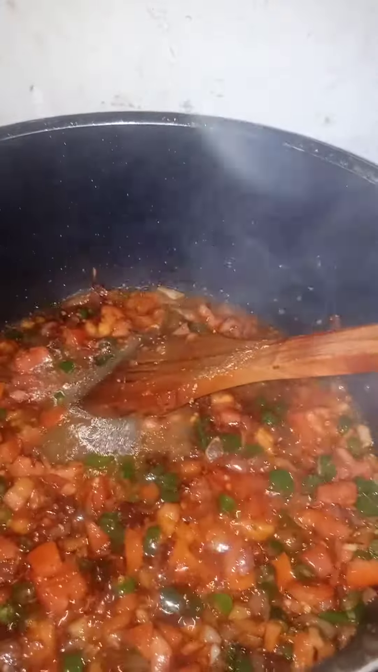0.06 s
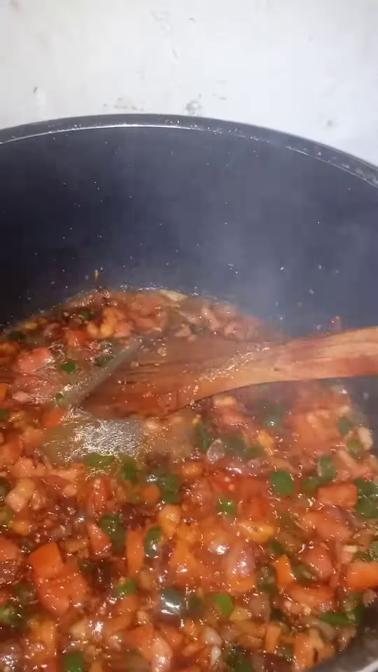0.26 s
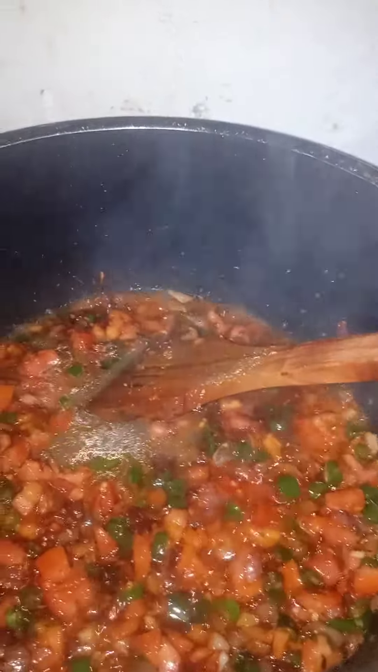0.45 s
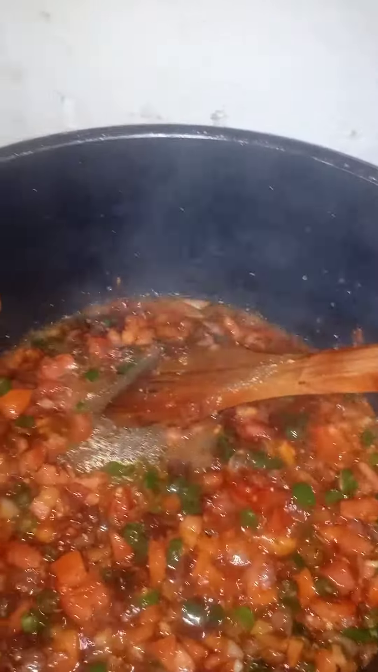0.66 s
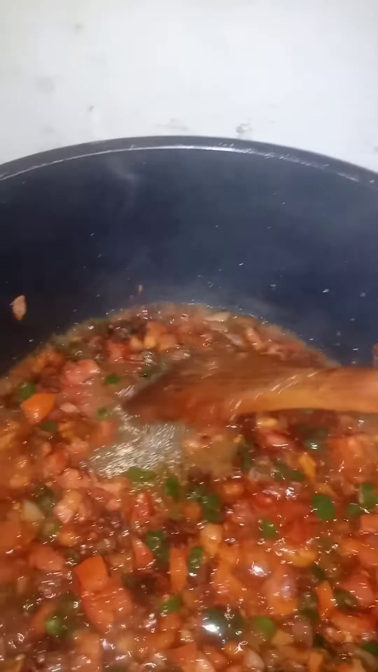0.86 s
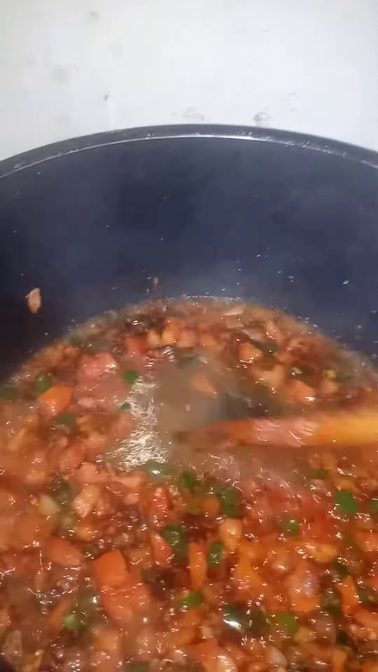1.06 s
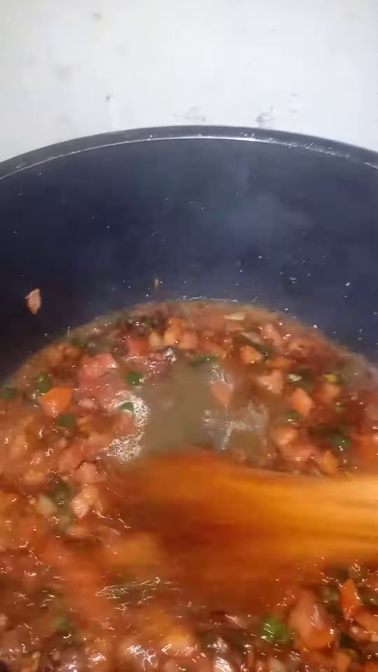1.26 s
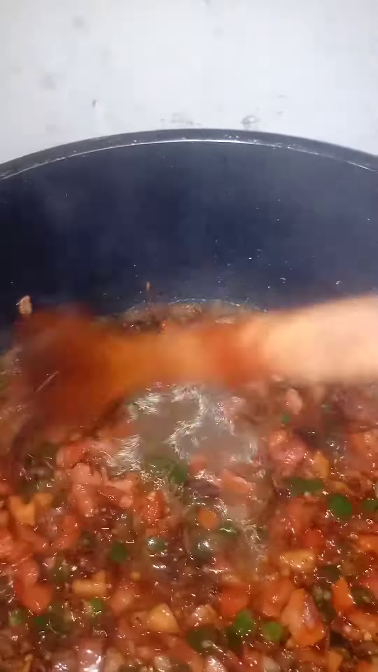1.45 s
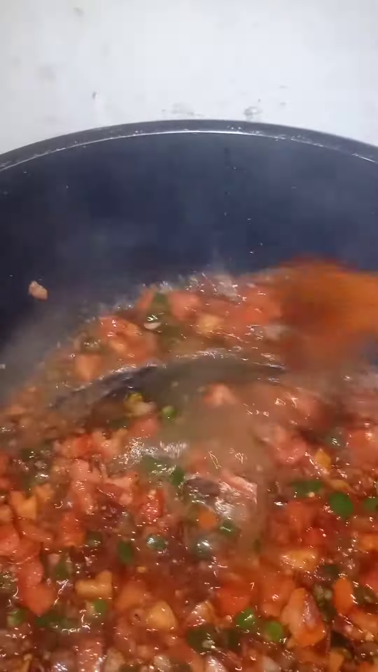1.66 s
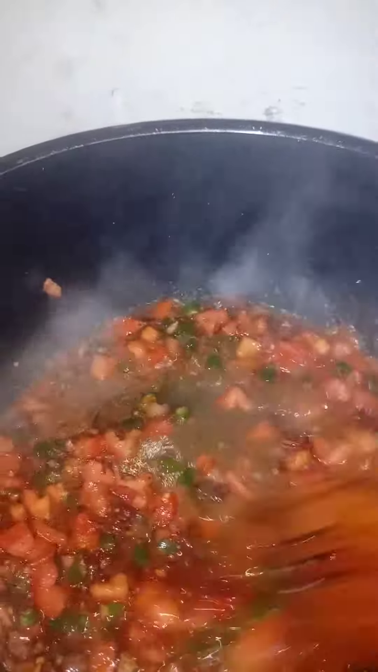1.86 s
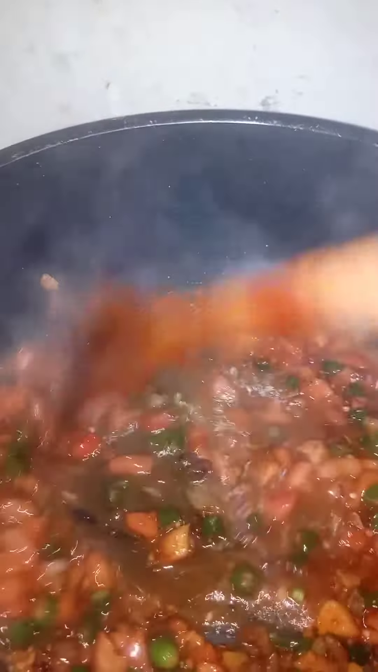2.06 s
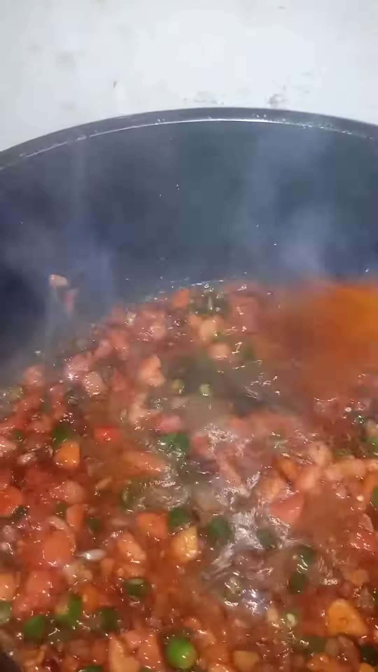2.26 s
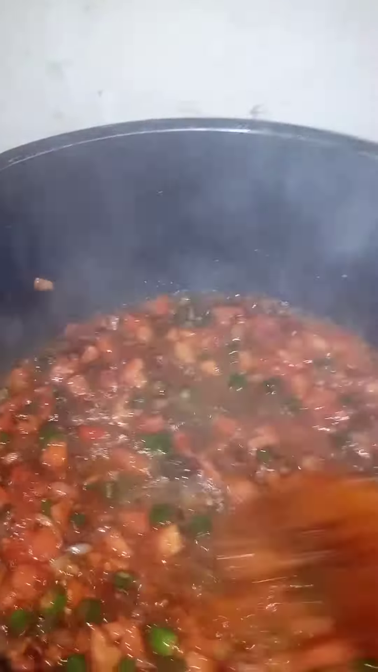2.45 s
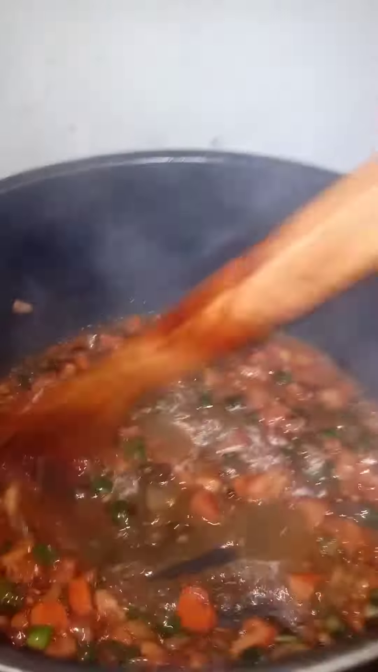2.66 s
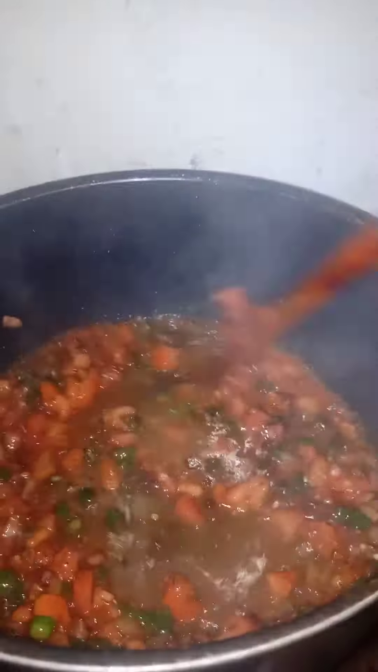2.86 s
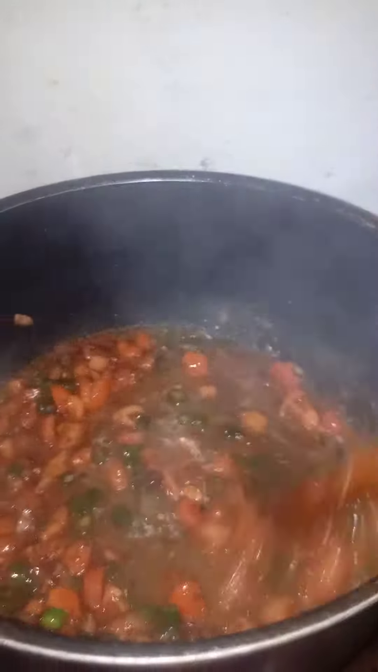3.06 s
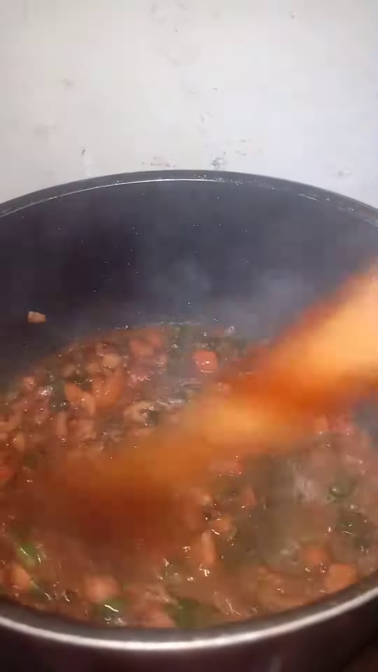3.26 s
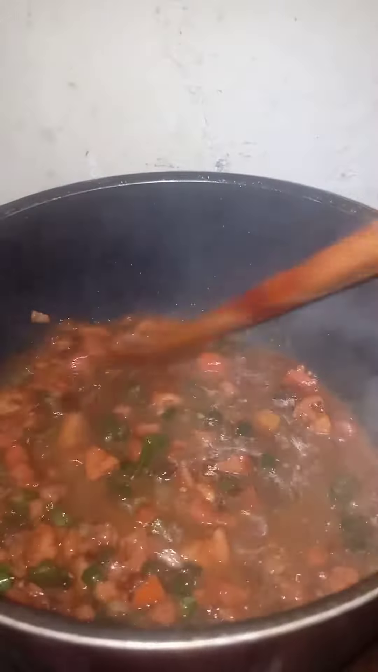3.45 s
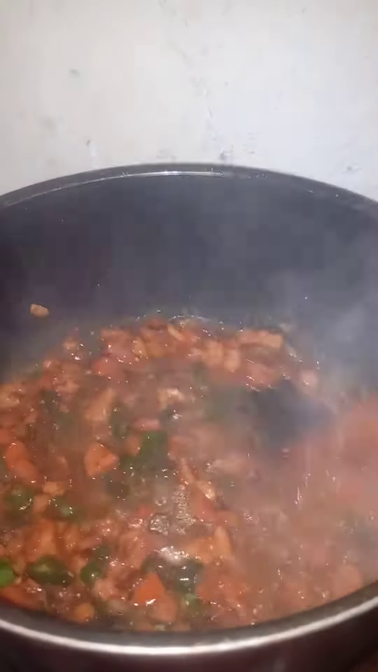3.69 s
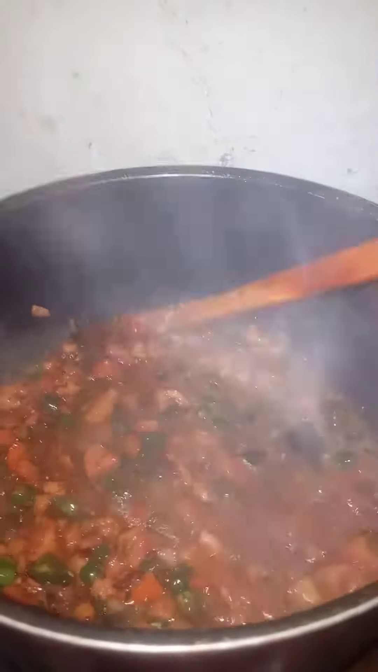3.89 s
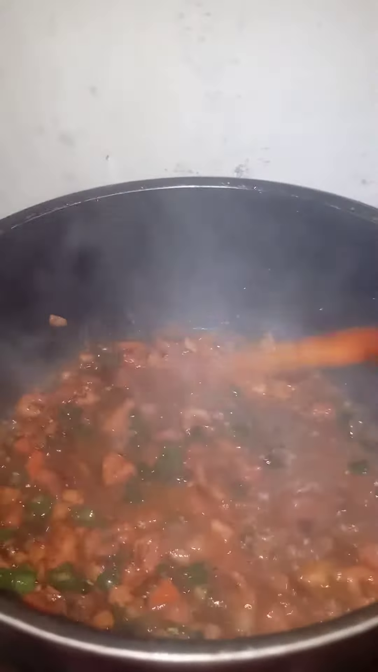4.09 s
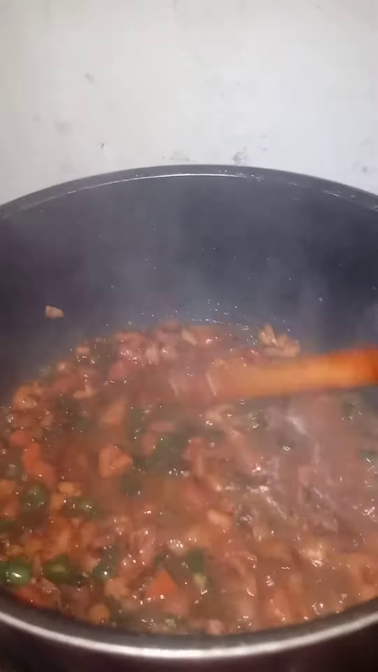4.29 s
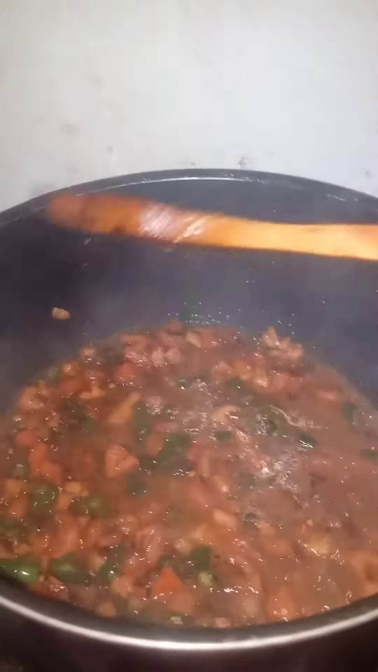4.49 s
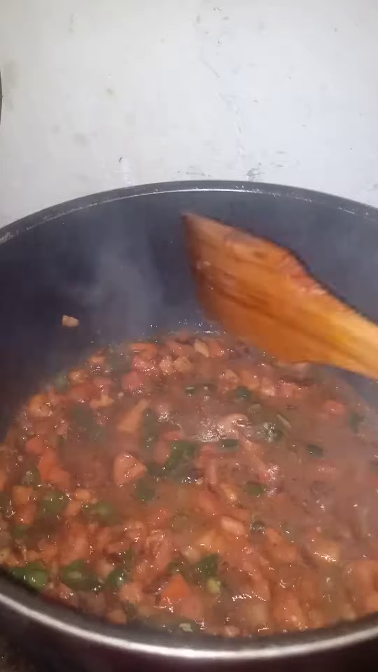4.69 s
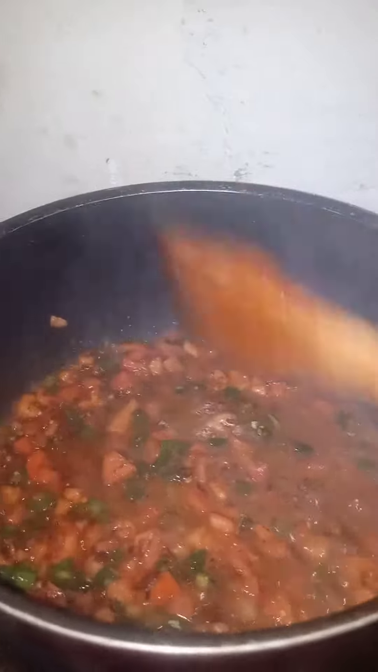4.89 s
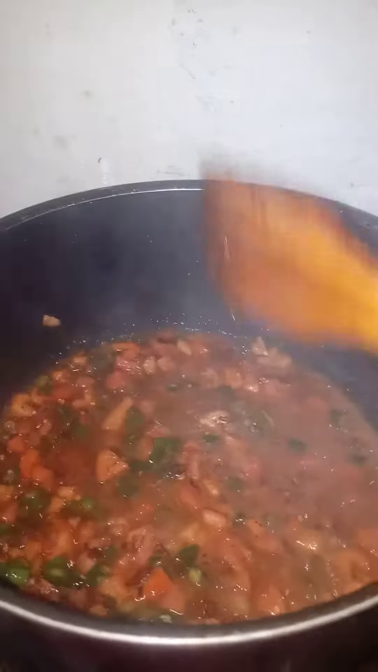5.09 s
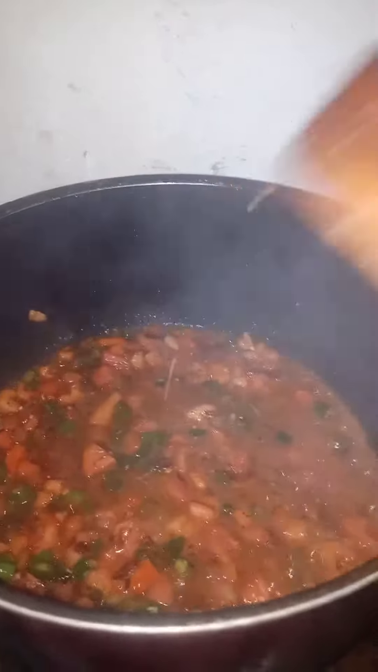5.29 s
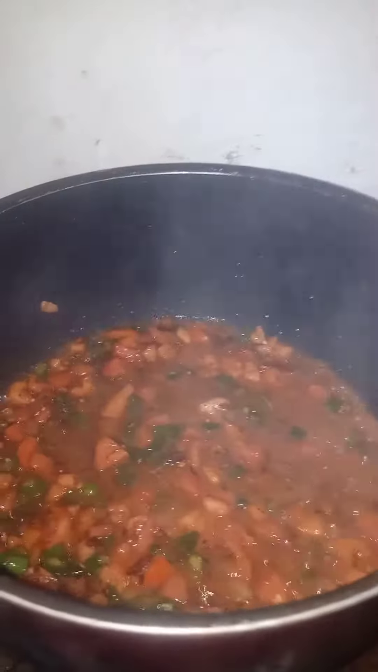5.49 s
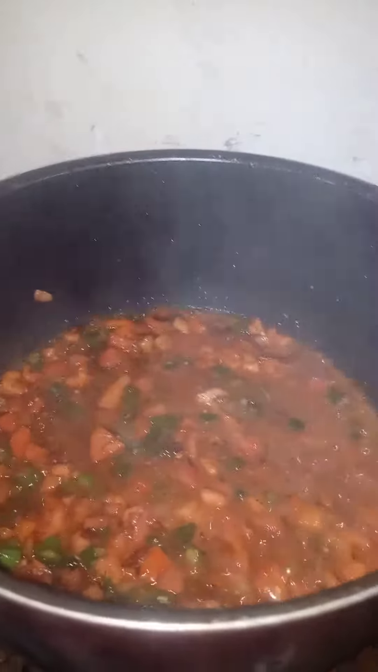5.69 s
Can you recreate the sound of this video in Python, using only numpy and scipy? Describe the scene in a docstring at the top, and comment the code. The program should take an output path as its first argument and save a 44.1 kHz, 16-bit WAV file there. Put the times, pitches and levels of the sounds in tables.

```python
"""Small kitchen: curry simmers and sizzles in a deep metal pot, heard close up.
Steam bursts and bubbles are random impulses and noise, shaped by filters and by the air in the pot.
A wooden spoon stirs, bumps the bottom, pats the thick sauce and raps the rim three times.
Each hit sums damped modes and filtered contact noise; room and pot answer with slow low resonances.
The hiss swells whenever wet sauce is pushed over hot metal."""
import sys
import numpy as np
from scipy import signal
from scipy.fft import rfft, irfft, next_fast_len
from scipy.io import wavfile
from scipy.ndimage import map_coordinates

SR = 44100
rng = np.random.default_rng(int(sys.argv[2]) if len(sys.argv) > 2 else 0)


def inscribe(sig):
    """Save sig as 16-bit PCM at rate SR to the path in sys.argv[1].

    A 1-D sig is mono; a 2-D sig holds one channel per row.
    Samples are clipped to [-1, 1] before scaling.
    """
    pcm = np.round(np.clip(np.atleast_2d(sig).T, -1, 1) * 32767)
    wavfile.write(sys.argv[1], SR, pcm.astype(np.int16))


N = 252944

# Strokes pushing wet sauce over hot metal: start_s, push_s, added_sizzle_limit_db
STROKES = [(0.0, 0.28, -52), (0.625, 0.037, -60), (1.534, 0.39, -42.5), (2.07, 0.1, -47.5),
           (2.38, 0.17, -53), (2.965, 0.43, -48), (3.556, 0.19, -46.5)]
# Filter curves of sizzle, seething simmer and fine spray: freq_hz, gain_db
SIZZLE_CURVE = [(600, -54), (1200, -11.5), (1650, -6.5), (2400, -3), (3300, -2.5), (4400, 1.5),
                (4900, -2.5), (5700, -19.5), (6500, -21.5), (7300, -31), (8200, -46.5), (16000, -77.5)]
SIMMER_CURVE = [(40, -37.5), (90, -14.5), (150, -27), (220, -13.5), (330, -14.5), (1000, -6), (1400, -9),
                (2500, -24.5), (6000, -76)]
SPRAY_CURVE = [(5000, -31), (8000, -18.5), (11000, -9), (13800, -7), (14900, -1), (15800, -4.5)]
# Air resonances in the pot, low and high: freq_hz, width_hz, gain_db
AIR_LOW = [(326.6, 19.6, -1), (524, 153, -9.5), (642, 19, 2), (870, 124, -6), (1041, 98, -2)]
AIR_HIGH = [(2017, 40, 1.3), (2437, 146, 1.6), (2980, 87, 3.1), (3560, 65, 2.2), (3996, 193, 1.2),
            (4500, 96, 0.4)]

# Spoon on the pot through sauce: start_s, level_db (before trim), then relative body_db, thump_db,
# clack_db, spoon_db, and drag_t60_s, floor_pitch_hz, floor_db
BUMPS = [(0.169, -35, -2, -10.5, -0.5, -8, 0.03, 283, 3), (0.222, -45, 1, -11, -17, -17, 0.016, 271, -3),
         (0.364, -31, -0.5, -16.5, -19, -3.5, 0.029, 336, 3.5),
         (0.378, -32, -14, -35, -18, -10, 0.017, 228, 2), (0.403, -36, -12, -25, -22, -12, 0.022, 262, 6),
         (1.428, -42, -1, -11, -18, 0, 0.03, 141, -4.5),
         (2.146, -36.5, -4.5, -12.5, -11, -5.5, 0.06, 227, 0),
         (2.419, -37, -14, -17, -21, 2.5, 0.03, 330, 0.5),
         (2.436, -40.5, 1.5, -10, -22, -1, 0.023, 140, -2.5),
         (2.924, -41, -20, -13, -27, -14, 0.02, 294, -2.5)]
# Flat of the spoon on sauce: start_s, level_db, reflection_pitch_hz, contact_cutoff_hz,
# then relative slap_db, reflection_db, room_return_db
PATS = [(2.312, -41.5, 396, 420, -18, -9.5, -10), (2.846, -40, 410, 1400, -8.5, -5, -9),
        (4.016, -30.5, 363, 1500, -7.5, -4, -8), (4.273, -34, 353, 602, -11, -2.5, -8.5)]
# Spoon dragged along the bottom: start_s, length_s, level_db
SLIDES = [(2.46, 0.24, -59), (3.13, 0.16, -56.5)]
# Spoon on the rim: start_s, level_db (before trim), relative thump_db, rim_db, crack_db,
# tip_pitch_hz, tip_db, favoured_mode_hz, favoured_mode_db, room_body_db
RAPS = [(4.719, -19, -7.5, -12.5, -14.5, 955, -3, 598, -14.5, -2.5),
        (4.969, -24, -7.5, -6.5, -11, 963, -4, 572.4, -7, -18),
        (5.187, -22, -9, -8, -7.5, 1056, -6, 363.5, -5.5, -12)]

# Slow shared low resonances of room and pot, upper and lowest: freq_hz, level_db, t60_s
BODY_MODES = [(210.4, 0.5, 0.33), (232.4, -18, 0.71), (265.7, -3.5, 0.54), (319.8, 5, 0.28),
              (353.4, -0.5, 0.41), (488, -10, 0.26), (565, -3.5, 0.38), (603, -2.5, 0.34), (654, -6, 0.42),
              (745, -8.5, 0.22), (906, -16.5, 0.38), (954, -6.5, 0.38), (1306, -12.5, 0.18),
              (1370, -16.5, 0.22)]
THUMP_MODES = [(75, -7.5, 1), (95.6, 0, 0.56), (137.3, -3.5, 0.34)]
# Modes of rim, spoon handle, room's ringing return after a pat, wet blade: freq_hz, level_db, t60_s
RIM_MODES = [(2070, -6, 0.09), (2300, -7, 0.13), (3030, -12, 0.12), (3330, -0.5, 0.097), (3560, -1, 0.15),
             (3704, -5, 0.17), (3800, -6, 0.06), (4770, -11, 0.06)]
HANDLE_MODES = [(322.8, -2.5, 0.21), (628, -13, 0.066)]
RETURN_MODES = [(364, 5, 0.35), (403, -12, 0.43), (468, -8.5, 0.29), (524, -4, 0.21), (562, -11.5, 0.2),
                (650, -11.5, 0.18)]
BLADE_MODES = [(342, -1, 0.082), (483, 1.5, 0.08), (646, -2.5, 0.19), (810, -10.5, 0.09)]
# Modes of pot floor, hollow early reflection of a slap, spoon tip: pitch_multiple, level_db, t60_s
FLOOR_MODES = [(1, 1, 0.11), (1.63, -13.5, 0.11), (2.15, -20, 0.2)]
REFLECTION_MODES = [(0.55, -26, 0.16), (1, 7, 0.043), (1.75, -12.5, 0.045)]
TIP_MODES = [(0.84, -10.5, 0.04), (1, 3, 0.036), (1.24, -12, 0.05)]

# Filter curves of cushioned knock, wood clack, spoon edge on metal, sauce splash, drag rumble,
# wooden knock, hard crack on the rim, late room body: freq_hz, gain_db
THUD_CURVE = [(70, -25), (140, -24.5), (220, -1), (320, -3.5), (420, -1.5), (530, -10.5), (750, -10.5),
              (1100, -23.5), (1500, -21), (6000, -64)]
CLACK_CURVE = [(400, -31.5), (900, 7), (1850, 4.5), (2200, 1.5), (5000, -30.5), (8000, -69)]
KNOCK_CURVE = [(150, -36), (350, 8), (600, 5), (950, 1.5), (1300, -14), (2200, -17), (6000, -54)]
SAUCE_CURVE = [(60, -51), (100, -36.5), (150, -41), (200, -12.5), (250, -25.5), (320, 10.5), (390, 9),
               (480, -2.5), (650, -15.5), (900, -27), (1500, -31), (5000, -81)]
RUMBLE_CURVE = [(50, -14), (90, -4.5), (150, -4.5), (230, -4), (320, 1.5), (450, -4.5), (900, -30),
                (3000, -90)]
WOOD_CURVE = [(80, -23.5), (150, -12.5), (210, -3.5), (330, 2), (450, 0.5), (620, -4), (780, -2.5),
              (1000, -12), (1400, -8.5), (2200, -19), (4500, -27), (5800, -41), (7300, -54), (8500, -75)]
CRACK_CURVE = [(600, -47), (1200, -2), (1700, -5), (2400, -5), (3500, 5.5), (4600, 5.5), (5700, -10.5),
               (7200, -27.5), (8300, -49), (12000, -43), (16000, -68)]
ROOM_BODY_CURVE = [(120, -34.5), (220, -2), (380, 0.5), (600, -1.5), (780, 1), (900, -12), (1200, -19),
                   (2500, -54), (7000, -100)]
# Kitchen reverberation: freq_hz, t60_s
KITCHEN_DECAY = [(100, 1), (350, 0.52), (1000, 0.45), (4000, 0.059)]

# Boiling: levels with a bare patch on the bottom; time constants of flare-up and drying
SIZZLE_DB, SIMMER_DB, SPRAY_DB = -47, -53, -84.5
FLARE_TAU_S, DRY_TAU_S = 0.27, 0.25
# Sauce flows over the bare patch: onset, time constant, final sizzle change
COVER_START_S, COVER_TAU_S, COVERED_DB = 4.04, 0.92, -4.5
SPRAY_DB_PER_SIZZLE_DB, SIMMER_DB_PER_COVER_DB = 2.3, 0.61
# Tonal grain in the sizzle: median pitch, its log spread, cycles to fall to 1/e, gain
GRAIN_HZ, GRAIN_LOG_SPREAD, GRAIN_CYCLES, GRAIN_DB = 3500, 0.26, 10, -8

# Hits: rise times of the shared modes, favoured mode's decay, delays after contact
THUMP_RISE_S, BODY_RISE_S, FAVOURED_T60_S = 0.0078, 0.02, 0.19
SKID_S, REFLECTION_S, RETURN_S, ROOM_BODY_S = 0.005, 0.00693, 0.034, 0.018
RAP_SPOON_DB, RAP_BODY_DB, RAP_WOOD_DB = 1.5, -5.5, -8
RAP_BUZZ_DB, RAP_CLACK_DB = -1.5, -17
# Dull return of a rap from across the kitchen
FAR_WALL_S, FAR_WALL_DB, FAR_WALL_HZ = 0.046, -14.5, 583
# Microphone band limits
LOW_HZ, TOP_HZ = 59, 15800


def amp(db):
    """Decibels to gain."""
    return 10 ** (np.asarray(db) / 20)


def unit(x):
    """Scale to rms 1."""
    return x / np.sqrt(np.mean(x ** 2) + 1e-20)


def blow(x):
    """Scale a hit to rms 1 over its first 40 ms."""
    return x / np.sqrt(np.mean(x[:SR // 25] ** 2) + 1e-20)


def along(points, hz):
    """Interpolate (freq_hz, value) points on a log frequency axis."""
    f, v = np.transpose(points)
    return np.interp(np.log(hz + 1), np.log(f + 1), v)


def wobble(rate_hz):
    """Smooth random curve, rate_hz knots a second."""
    knots = rng.standard_normal(int(N * rate_hz / SR) + 4)
    return map_coordinates(knots, [np.arange(N) * rate_hz / SR])


def swell(start_s, length_s):
    """Half-sine rise and fall."""
    return np.sin(np.pi * np.clip((np.arange(N) / SR - start_s) / length_s, 0, 1))


def filtered(x, response):
    """Multiply the spectrum by a response of frequency."""
    m = next_fast_len(len(x) + SR // 2)
    return irfft(rfft(x, m) * response(np.fft.rfftfreq(m, 1 / SR)), m)[:len(x)]


def coloured(x, points):
    """Minimum-phase filter with the gain of (freq_hz, gain_db) points."""
    size = 8192
    cepstrum = irfft(np.log(amp(along(points, np.fft.rfftfreq(size, 1 / SR)))))
    # fold to the causal half
    cepstrum[1:size // 2] *= 2
    cepstrum[size // 2 + 1:] = 0
    impulse = irfft(np.exp(rfft(cepstrum)))
    return signal.fftconvolve(x, impulse)[:len(x)]


def resonant(x, peaks):
    """Parallel resonances of alternating sign, with steep skirts outside their range."""
    def response(f):
        total = 0
        for k, (hz, width_hz, db) in enumerate(peaks):
            band = 1j * f * width_hz
            total = total + (-1) ** k * amp(db) * band / (hz * hz - f * f + band)
        return total
    y = filtered(x, response)
    low_hz = min(p[0] for p in peaks) * 0.76
    high_hz = min(max(p[0] for p in peaks) * 1.088, SR / 3)
    return signal.sosfilt(signal.butter(8, [low_hz, high_hz], 'band', fs=SR, output='sos'), y)


def softened(x, hz):
    """Low-pass: a soft contact or dull wall passes little above hz."""
    return signal.sosfilt(signal.butter(2, min(hz, SR / 3), fs=SR, output='sos'), x)


def pops(rate_hz, spread_db):
    """Bursting bubbles: random impulses of uneven size, rate_hz a second on average."""
    hits = rng.random(N) < rate_hz / SR
    return unit(hits * rng.standard_normal(N) * amp(spread_db * rng.standard_normal(N)))


def tuned(modes, hz):
    """Set modes given as pitch multiples on a pitch."""
    return [(k * hz, db, t60_s) for k, db, t60_s in modes]


def ring(modes, rise_s=0.0011):
    """Damped modes that swell over rise_s, at new strengths for each blow."""
    t = np.arange(SR) / SR
    total = 0
    for k, (hz, db, t60_s) in enumerate(modes):
        decay = amp(db + rng.normal() - 60 * t / t60_s)
        total = total + decay * np.sin(2 * np.pi * hz * t) * (-1) ** k
    return blow((1 - np.exp(-(t / rise_s) ** 2)) * total)


def contact(t60_s, chatter_db):
    """One push plus decaying noise chatter."""
    chatter = rng.standard_normal(SR) * amp(-60 * np.arange(SR) / SR / t60_s)
    return signal.unit_impulse(SR) + amp(chatter_db) * chatter / np.linalg.norm(chatter)


def echoed(x, wet_db):
    """A short sound followed by the kitchen's answer, in which bass lasts longest."""
    hz, t, z = signal.stft(rng.standard_normal(SR), SR, nperseg=256)
    decay = amp(-60 * t / along(KITCHEN_DECAY, hz)[:, None])
    tail = signal.istft(z * decay, SR, nperseg=256)[1]
    tail[:round(.007 * SR)] = 0  # delay of the nearest wall
    return x + amp(wet_db) * signal.fftconvolve(x, tail / np.linalg.norm(tail))[:len(x)]


def add(track, start_s, sound):
    """Mix a sound in at start_s."""
    part = track[round(start_s * SR):][:len(sound)]
    part += sound[:len(part)]


def in_pot(x, t60_s, wet_db):
    """Reflections between the pot's walls comb a sound into many fixed narrow peaks."""
    return unit(signal.fftconvolve(x, contact(t60_s, wet_db))[:N])


def tonal_grains(rate_hz, spread_db):
    """Short decaying sines at random pitches that add a faint tonal grain to the sizzle."""
    pitch, size = rng.standard_normal((round(rate_hz * N / SR), 2)).T
    hz = np.minimum(GRAIN_HZ * np.exp(GRAIN_LOG_SPREAD * pitch), SR / 3)[:, None]
    cycles = hz * np.arange(400) / SR
    grains = np.sin(2 * np.pi * cycles) * np.exp(-cycles / GRAIN_CYCLES)
    grains *= amp(spread_db * size)[:, None]
    starts = rng.integers(0, N, len(grains))[:, None]
    places = starts + np.arange(grains.shape[1])
    return unit(np.bincount(places.ravel(), grains.ravel(), N)[:N])


def boiling():
    """Sizzle, simmer, spray dB: strokes flare and boil dry; all calm as sauce covers the bottom."""
    t = np.arange(N) / SR
    covered_db = COVERED_DB * (1 - np.exp(-np.maximum(t - COVER_START_S, 0) / COVER_TAU_S))
    power = amp(SIZZLE_DB + covered_db) ** 2
    for start_s, push_s, db in STROKES:
        wetted = 1 - np.exp(-np.clip(t - start_s, 0, push_s) / FLARE_TAU_S)
        drying = np.exp(-np.maximum(t - start_s - push_s, 0) / DRY_TAU_S)
        power = power + amp(db) ** 2 * wetted * drying
    sizzle_db = 10 * np.log10(power)
    simmer_db = SIMMER_DB + SIMMER_DB_PER_COVER_DB * covered_db
    spray_db = SPRAY_DB + SPRAY_DB_PER_SIZZLE_DB * (sizzle_db - SIZZLE_DB)
    return sizzle_db, simmer_db, spray_db


def cooking():
    """Tiny steam bursts hiss, larger bubbles simmer; both sound the air in the pot."""
    sizzle_db, simmer_db, spray_db = boiling()
    bursts = unit(pops(1500, spread_db=-1.5) + amp(4.5) * rng.standard_normal(N))
    hiss = in_pot(coloured(bursts, SIZZLE_CURVE), t60_s=.07, wet_db=-10)
    hollow = in_pot(resonant(pops(5000, spread_db=3), AIR_HIGH), t60_s=.1, wet_db=-7)
    spits = in_pot(coloured(pops(60, spread_db=2), SIZZLE_CURVE), t60_s=.04, wet_db=3)
    grain = unit(coloured(tonal_grains(450, spread_db=4.5), SIZZLE_CURVE))
    sizzle = amp(-3.0) * hiss + amp(-3.5) * hollow + amp(-14.5) * spits + amp(GRAIN_DB) * grain
    sizzle *= amp(sizzle_db + 0.5 * wobble(20))

    bubbles = unit(resonant(pops(1500, spread_db=0.5), AIR_LOW))
    seethe = unit(coloured(rng.standard_normal(N), SIMMER_CURVE))
    simmer = amp(simmer_db + 0.2 * wobble(3.5)) * (amp(-0.5) * bubbles + amp(-6.0) * seethe)

    droplets = pops(2700, spread_db=-12.0) + amp(10.5) * bursts
    spray = amp(spray_db + 1.2 * wobble(24)) * unit(coloured(droplets, SPRAY_CURVE))
    return sizzle + simmer + spray


def bumps():
    """Sauce cushions the spoon: dull knock, slow low resonances of room and pot, then a wood clack."""
    track = np.zeros(N)
    for start_s, db, body_db, thump_db, clack_db, spoon_db, drag_t60_s, floor_hz, floor_db in BUMPS:
        push = contact(drag_t60_s, chatter_db=-8)
        knock = blow(coloured(echoed(push, wet_db=-7.5), THUD_CURVE))
        floor = ring(tuned(FLOOR_MODES, floor_hz), rise_s=0.001)
        body = blow(softened(ring(BODY_MODES, BODY_RISE_S), 490))
        thump = ring(THUMP_MODES, THUMP_RISE_S)
        skid = contact(t60_s=0.11, chatter_db=30)
        clack = blow(coloured(echoed(skid, wet_db=-15), CLACK_CURVE))
        spoon = blow(coloured(contact(t60_s=0.1, chatter_db=8), KNOCK_CURVE))
        bump = knock / 2 + amp(floor_db) * floor + amp(body_db) * body
        bump += amp(thump_db) * thump + amp(spoon_db) * spoon
        add(track, start_s, amp(db - 11.0) * bump)
        add(track, start_s + SKID_S, amp(db + clack_db - 9.0) * clack)
    return track


def pats():
    """Blade slaps sauce; a hollow early reflection follows, then the room's ringing return."""
    track = np.zeros(N)
    for start_s, db, reflection_hz, contact_hz, slap_db, reflection_db, room_return_db in PATS:
        push = contact(t60_s=0.08, chatter_db=10)
        splash = blow(coloured(echoed(push, wet_db=-6), SAUCE_CURVE))
        blade = ring(BLADE_MODES, rise_s=0.0014)
        slap = blow(softened(blade + amp(-8) * splash, contact_hz))
        reflection = ring(tuned(REFLECTION_MODES, reflection_hz), rise_s=0.007)
        room_return = ring(RETURN_MODES, rise_s=0.003)
        add(track, start_s, amp(db + slap_db) * slap)
        add(track, start_s + REFLECTION_S, amp(db + reflection_db) * reflection)
        add(track, start_s + RETURN_S, amp(db + room_return_db) * room_return)
    return track


def slides():
    """The dragged spoon sets off a faint rumble of filtered impulses that swells and fades."""
    track = np.zeros(N)
    for start_s, length_s, db in SLIDES:
        rumble = unit(coloured(pops(290, spread_db=1.0), RUMBLE_CURVE))
        track += amp(db) * swell(start_s, length_s) * rumble
    return track


def raps():
    """Bare wood on the rim: spoon knock, buzzing metal, slow low resonances, then late room body."""
    track = np.zeros(N)
    for (start_s, db, thump_db, rim_db, crack_db,
         tip_hz, tip_db, favoured_hz, favoured_db, room_body_db) in RAPS:
        tip = echoed(ring(tuned(TIP_MODES, tip_hz), rise_s=0.00095), wet_db=-16)
        spoon = amp(RAP_SPOON_DB) * ring(HANDLE_MODES) + amp(tip_db) * tip
        favoured = ring([(favoured_hz, 0, FAVOURED_T60_S)], BODY_RISE_S)
        body = amp(RAP_BODY_DB) * ring(BODY_MODES, BODY_RISE_S) + amp(favoured_db) * favoured

        wood_push = contact(t60_s=0.041, chatter_db=-9.0)
        wood = blow(coloured(echoed(wood_push, wet_db=1), WOOD_CURVE))
        crack_push = contact(t60_s=0.082, chatter_db=23)
        crack = blow(coloured(echoed(crack_push, wet_db=1.5), CRACK_CURVE))
        buzz_push = contact(t60_s=.02, chatter_db=-9)
        buzz = blow(signal.fftconvolve(ring(RIM_MODES), buzz_push)[:SR])
        clack_push = contact(t60_s=0.073, chatter_db=16.5)
        clack = blow(coloured(echoed(clack_push, wet_db=-13.5), CLACK_CURVE))

        metal = amp(RAP_BUZZ_DB) * buzz + amp(RAP_CLACK_DB) * clack
        knock = spoon + body + amp(RAP_WOOD_DB) * wood
        thump = amp(thump_db - 2.5) * ring(THUMP_MODES, THUMP_RISE_S)
        rap = knock + thump + amp(rim_db) * metal + amp(crack_db) * crack
        rap *= amp(db - 14.5)

        # the kitchen's low-mid answer
        room_push = contact(t60_s=0.17, chatter_db=25)
        room_body = blow(coloured(echoed(room_push, wet_db=-12), ROOM_BODY_CURVE))
        add(track, start_s, rap)
        add(track, start_s + ROOM_BODY_S, amp(db + room_body_db - 17.5) * room_body)
        add(track, start_s + FAR_WALL_S, amp(FAR_WALL_DB) * softened(rap, FAR_WALL_HZ))
    return track


def scene():
    """Pot, spoon and the room's answers, heard from one point."""
    return (cooking() + bumps() + pats() + slides() + raps())[None]


def record(dry):
    """The microphone sheds deep bass and keeps nothing above its band limit."""
    thin = signal.sosfilt(signal.butter(6, LOW_HZ, 'high', fs=SR, output='sos'), dry)
    return np.array([filtered(channel, lambda hz: hz < TOP_HZ) for channel in thin])


dry = scene()
out = record(dry)
inscribe(out)
```